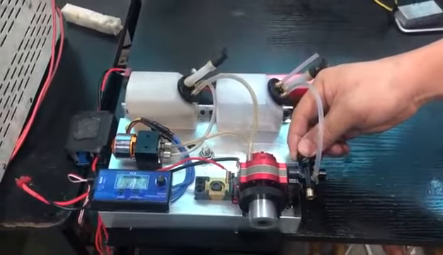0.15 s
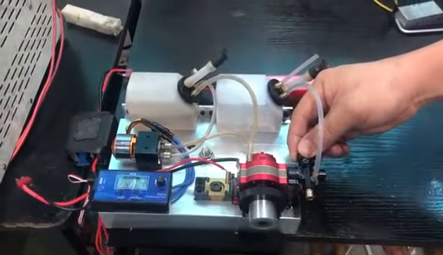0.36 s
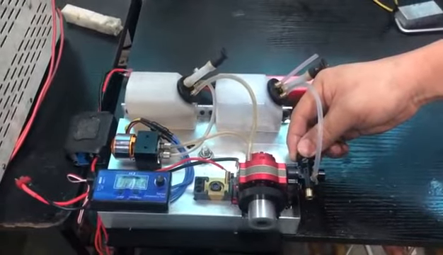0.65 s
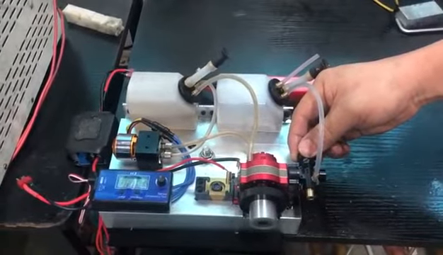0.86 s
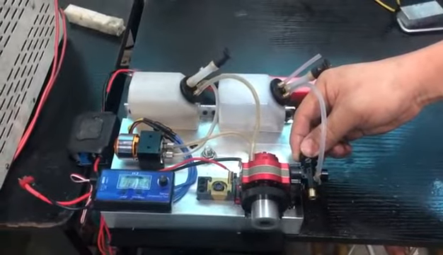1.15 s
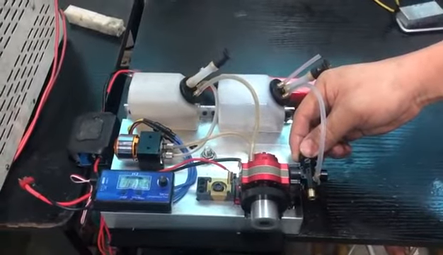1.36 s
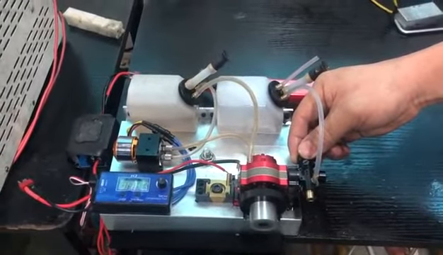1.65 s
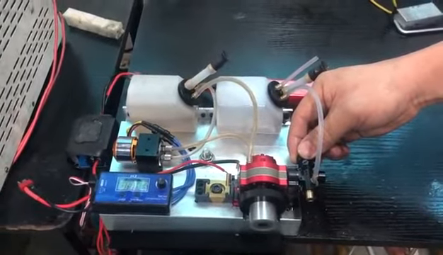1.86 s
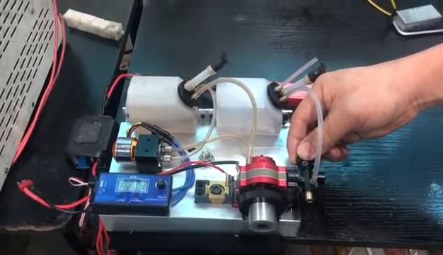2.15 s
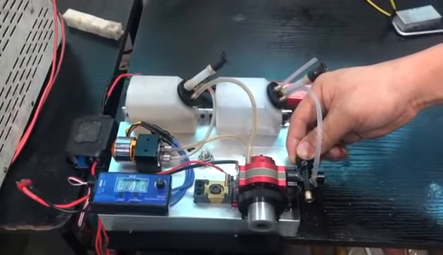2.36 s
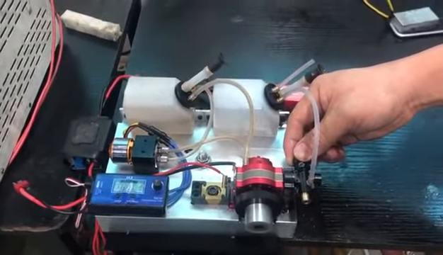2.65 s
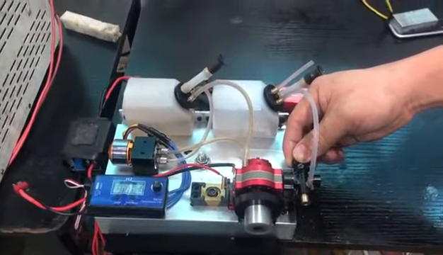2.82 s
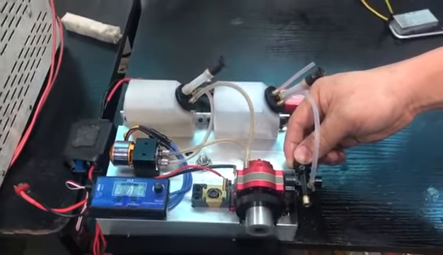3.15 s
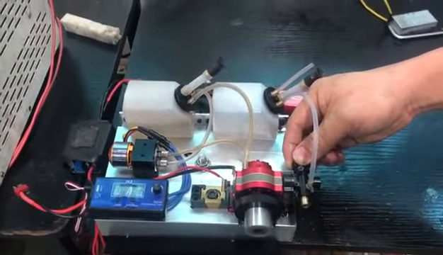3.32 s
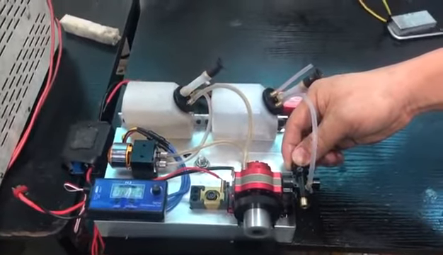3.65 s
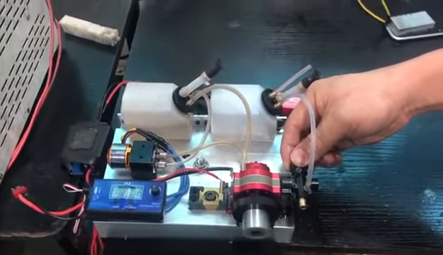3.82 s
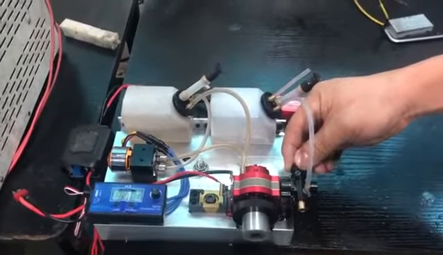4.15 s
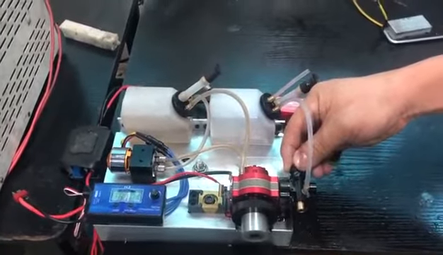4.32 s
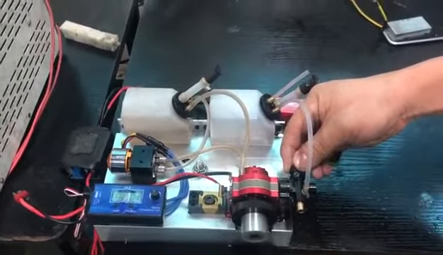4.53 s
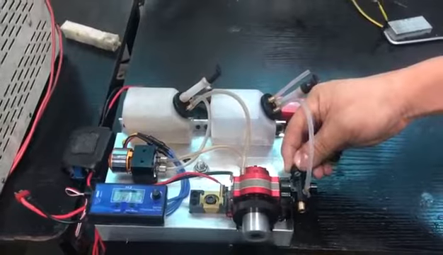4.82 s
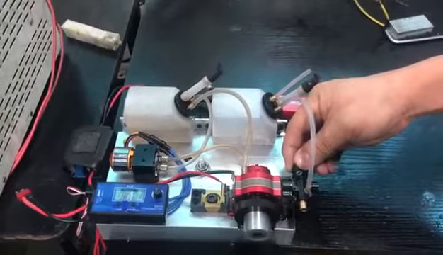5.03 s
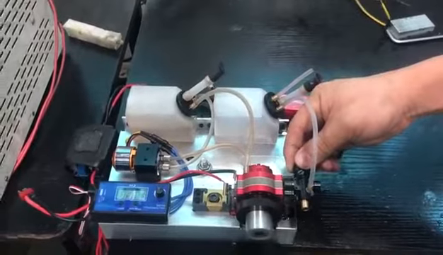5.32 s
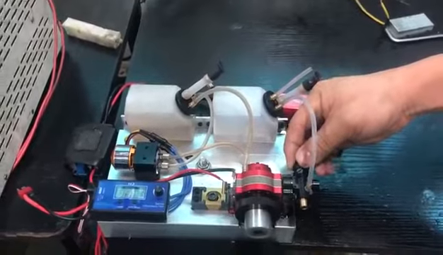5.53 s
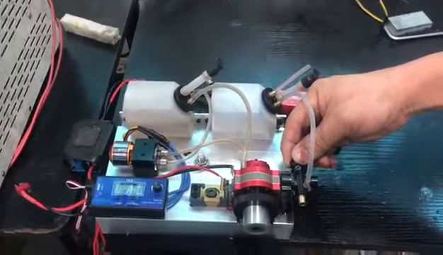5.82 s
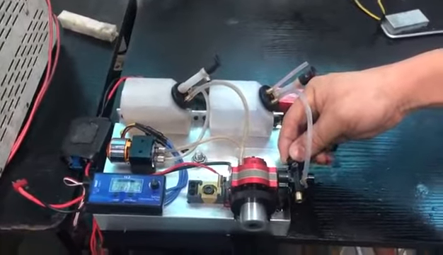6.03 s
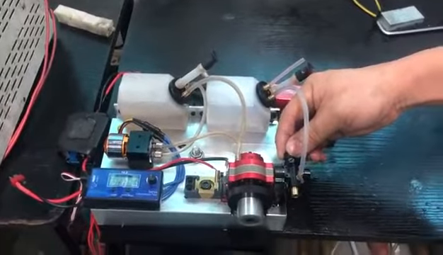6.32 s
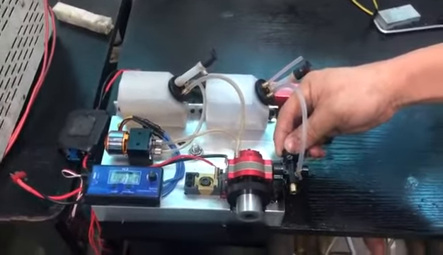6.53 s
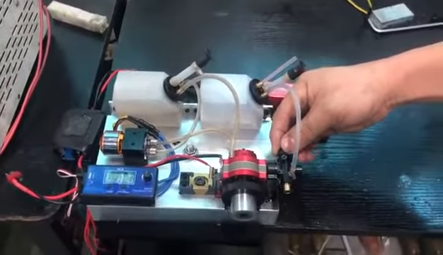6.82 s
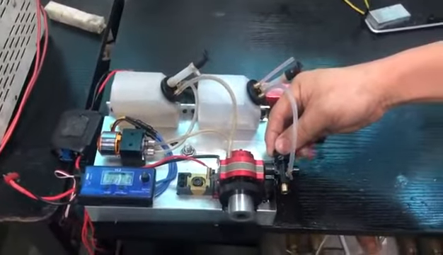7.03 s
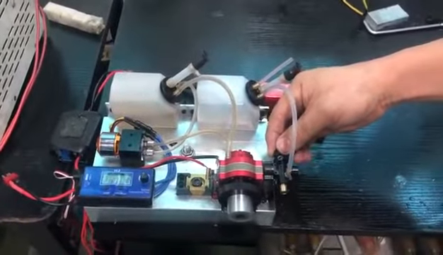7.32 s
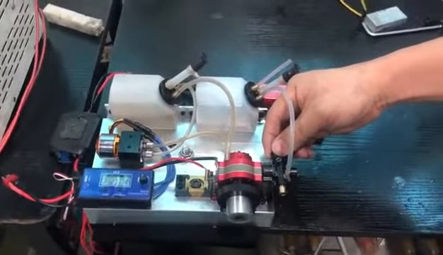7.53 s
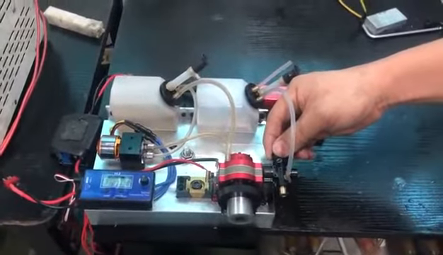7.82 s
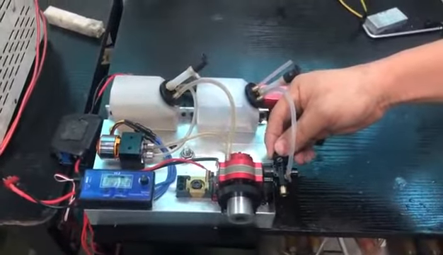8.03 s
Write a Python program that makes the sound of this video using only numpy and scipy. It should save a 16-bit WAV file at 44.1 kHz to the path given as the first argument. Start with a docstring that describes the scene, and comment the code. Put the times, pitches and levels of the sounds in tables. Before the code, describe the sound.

Close by, a small model engine buzzes at full throttle, drops to a rough idle and is blipped again and again.

```python
"""Model rotary engine on a bench

Close by, it runs flat out for four seconds, sputters down, then is blipped seven times.
Each shaft turn opens the exhaust port once: a sharp pop and a spit of gas if the charge burns,
a soft puff if not. The three rotor faces fire slightly unlike, which adds a growl. The eccentric
rotor makes the base hum; off the throttle the engine coasts with a whirr of gears and seals."""
import sys
import numpy as np
from scipy import signal
from scipy.fft import rfft, irfft, next_fast_len
from scipy.io import wavfile
from scipy.ndimage import uniform_filter1d, map_coordinates

SR = 44100
rng = np.random.default_rng(int(sys.argv[2]) if len(sys.argv) > 2 else 0)


def transcribe(u):
    """Save the signal u as a 16-bit wav file named by the first command-line argument.

    u: samples, shape (n,) or (channels, n), limited to [-1, 1]; the rate is SR.
    q: integer samples, one column per channel.
    """
    v = np.clip(np.atleast_2d(u).T, -1, 1)
    q = np.round(v * 32767).astype(np.int16)
    wavfile.write(sys.argv[1], SR, q)


N = 360283
TIME = np.arange(N) / SR
FFT_SIZE = next_fast_len(N + SR, real=True)
HZ = np.fft.rfftfreq(FFT_SIZE, 1 / SR)


def amp(db):
    """Decibels to gain."""
    return 10 ** (np.asarray(db) / 20)


def unit(x):
    """Scale to rms 1."""
    return x / np.sqrt(np.mean(x ** 2) + 1e-20)


def along(points, hz):
    """(freq_hz, value) rows read on a log axis."""
    freqs, values = np.transpose(points)
    return np.interp(np.log(hz + 1), np.log(freqs + 1), values)


def curve(rows):
    """(time_s, value) rows as one value per sample."""
    return np.interp(TIME, *np.transpose(rows))


def wobble(rate_hz):
    """Smooth random curve, rate_hz knots a second."""
    knots = rng.standard_normal(int(N * rate_hz / SR) + 4)
    return map_coordinates(knots, [TIME * rate_hz], mode="nearest")


def filtered(x, gain):
    """Apply a response given on the HZ grid."""
    return irfft(rfft(x, FFT_SIZE) * gain, FFT_SIZE)[:N]


def rolloff(ratio, order):
    """Gain near 1 for ratio < 1, falling as ratio ** -order above."""
    return 1 / np.hypot(1, ratio ** order)


def low_cut(corner_hz, order):
    """High-pass magnitude on the HZ grid."""
    return rolloff(corner_hz / (HZ + 1), order)


def causal(gain):
    """Minimum-phase response of this magnitude: rings only after it is struck."""
    cepstrum = irfft(np.log(np.maximum(gain, 1e-6)), FFT_SIZE)
    cepstrum[1:FFT_SIZE // 2] *= 2
    cepstrum[FFT_SIZE // 2 + 1:] = 0
    return np.exp(rfft(cepstrum))


def resonance(modes):
    """Gain of resonances in small parts, which radiate no bass."""
    power = sum((amp(db) / (1 + 2 * ((HZ - hz) / width_hz) ** 2)) ** 2 for hz, width_hz, db in modes)
    return np.sqrt(power) * low_cut(490, order=10)


def turn_number(turns):
    """Firing index of each sample; steps just before the port opens."""
    return np.floor(turns + .2).astype(int)


def pulses(turns, harmonics=44):
    """One sharp pulse per turn, every harmonic of size 1."""
    offset = turns - np.round(turns)
    return (harmonics + .5) * np.sinc((2 * harmonics + 1) * offset) / np.sinc(offset) - .5


def gusts(turns, decay_turns):
    """Gate of rms 1 that opens once a turn and decays."""
    return unit(np.exp(-(turns % 1) / decay_turns))


# shaft at full throttle: time_s, speed_hz
FULL_SPEED = [(0.03, 379.5), (0.09, 379.8), (0.15, 384.2), (0.32, 382.6), (0.38, 377.3), (0.66, 384.7),
              (0.73, 382.8), (0.89, 387.6), (1.04, 383.4), (1.22, 382.1), (1.28, 389.6), (1.36, 386.3),
              (1.42, 377.3), (1.93, 388.0), (2.3, 389.6), (2.42, 397.4), (2.44, 397.1), (2.47, 380.8),
              (2.51, 379.0), (2.68, 391.7), (2.79, 393.3), (2.87, 383.3), (3.02, 389.9), (3.53, 395.5),
              (3.56, 390.0), (3.59, 395.9), (3.81, 399.7), (3.84, 397.6), (3.93, 399.3), (3.95, 403.7)]
# shaft falling to a rough idle: time_s, speed_hz
RUN_DOWN_SPEED = [(3.99, 397.7), (4.112, 372.4), (4.314, 347.3), (4.324, 334.2), (4.42, 323.5),
                  (4.66, 314.2), (4.686, 302.8), (4.97, 303.2)]
# throttle blips: open_s, peak_s, flame_out_s, start_speed_hz, top_speed_hz, burn_db
THROTTLE_BLIPS = [(5.0, 5.335, 5.388, 306, 387, -12.6), (5.616, 5.99, 6.018, 314, 395.5, -12.3),
                  (6.218, 6.56, 6.622, 320.5, 394, -12.5), (6.892, 7.165, 7.208, 311, 373.5, -13),
                  (7.409, 7.59, 7.611, 319.5, 356, -12.9), (7.722, 7.91, 7.927, 335, 371, -13),
                  (8.03, 8.11, 8.2, 348, 358.5, -14)]


def shaft_speed(inertia_s=.015, sag_hz_per_s=50, coast_s=.2):
    """Turns per second: flat out, run-down, then blips drive the shaft up and friction slows it."""
    first_open_s, _, _, idle_hz, _, _ = THROTTLE_BLIPS[0]
    speed = curve(np.vstack([FULL_SPEED, RUN_DOWN_SPEED, (first_open_s, idle_hz)]))
    for blip, following in zip(THROTTLE_BLIPS, [*THROTTLE_BLIPS[1:], None]):
        open_s, peak_s, out_s, start_hz, top_hz, _ = blip
        climb = np.clip((TIME - open_s) / (peak_s - open_s), 0, 1) ** 1.04
        sag_hz = sag_hz_per_s * np.clip(TIME - peak_s, 0, out_s - peak_s)  # throttle closing
        run_hz = start_hz + (top_hz - start_hz) * climb - sag_hz
        if following is not None:
            next_open_s, _, _, next_hz, _, _ = following
            coasted_s = np.maximum(TIME - out_s, 0)
            slowed = np.expm1(-coasted_s / coast_s) / np.expm1(-(next_open_s - out_s) / coast_s)
            run_hz += (next_hz - run_hz) * slowed
        speed = np.where(TIME >= open_s, run_hz, speed)
    return uniform_filter1d(speed, int(inertia_s * SR) + 1, mode="nearest")


# bursts of firing on a closed throttle: start_s, length_s, burn_db
IDLE_SPUTTERS = [(4.021, .011, -14.3), (4.036, .01, -12.5), (4.052, .017, -13.5), (4.075, .008, -19),
                 (4.089, .012, -16), (4.106, .012, -18), (4.124, .061, -14.8), (4.198, .011, -15.8),
                 (4.23, .01, -17.5), (4.256, .008, -16.5), (4.282, .008, -18.5), (4.327, .008, -13.8),
                 (4.35, .013, -17.8), (4.369, .027, -18.3), (4.427, .03, -20.5), (4.456, .07, -15.3),
                 (4.551, .022, -16.8), (4.597, .008, -18.3), (4.614, .03, -17.8), (4.699, .011, -18.2),
                 (4.718, .059, -16.8), (4.82, .082, -16.6), (4.927, .028, -17.3), (4.957, .045, -16.2),
                 (5.403, .006, -20), (5.421, .004, -15.5), (5.535, .008, -13.3), (5.549, .01, -16.3),
                 (6.041, .006, -20), (6.059, .005, -20.5), (6.133, .022, -19), (6.636, .006, -20.5),
                 (6.668, .005, -22), (6.772, .013, -18), (6.79, .017, -17.7), (6.819, .011, -18.5),
                 (6.835, .007, -16.5), (6.873, .004, -20), (7.281, .014, -13.8), (7.324, .003, -19.5),
                 (7.333, .006, -16.5), (7.374, .02, -13.2), (7.616, .013, -19), (7.653, .009, -16.5),
                 (7.684, .022, -14.5), (7.967, .009, -15.7), (7.991, .013, -15.8), (8.01, .011, -16.5)]


def ignitions(full_until_s=4.003, full_db=-12.5):
    """Stretches in which the charge ignites: start_s, end_s, burn_db."""
    blips = [(open_s, out_s, db) for open_s, _, out_s, _, _, db in THROTTLE_BLIPS]
    sputters = [(start_s, start_s + length_s, db) for start_s, length_s, db in IDLE_SPUTTERS]
    return [(0, full_until_s, full_db)] + blips + sputters


# rotor faces at low speed: strength_db, late_turns
ROTOR_FACES = [(1.3, -.010), (0, .011), (-1.3, 0)]


def rotor_face(speed, turns):
    """Strength and lateness of the face at the port; the faces grow more alike at top speed."""
    mismatch = np.interp(speed, [365, 388], [1, .35])
    return mismatch * np.transpose(ROTOR_FACES)[:, turn_number(turns) % len(ROTOR_FACES)]


# one or two missed firings each: time_s, depth_db
MISFIRES = [(.014, -15), (.126, -9), (.185, -7), (.244, -8), (.275, -7), (.289, -9), (.317, -7),
            (.337, -12), (.351, -13), (.369, -12), (.393, -11), (.406, -7), (.421, -14), (.581, -8),
            (.659, -9), (.675, -11), (.705, -9), (.909, -11), (.926, -10), (.94, -9), (1.151, -16),
            (1.165, -7), (1.181, -11), (1.335, -20), (1.344, -12), (1.362, -10), (1.377, -12), (1.4, -19),
            (1.494, -9), (1.536, -9), (1.559, -11), (1.644, -7), (2.013, -7), (2.19, -11), (2.26, -9),
            (2.438, -14), (2.445, -10), (2.452, -15), (2.459, -5), (2.475, -12), (2.483, -7), (2.51, -11),
            (2.592, -9), (2.808, -8), (2.861, -9), (2.877, -15), (3.01, -11), (3.03, -11), (3.072, -13),
            (3.093, -9), (3.305, -9), (3.31, -10), (3.37, -10), (3.385, -9), (3.785, -9), (3.831, -9),
            (3.848, -11), (3.967, -8), (8.112, -12), (8.128, -10)]


def misfire_db(pop_s, half_width_s=.0027, rebound=.22, rebound_s=.0074):
    """Firings near a misfire weaken; the unburnt fuel makes the next ones harder."""
    def dip(centre_s):
        return np.exp(-((pop_s - centre_s) / half_width_s) ** 2)
    return sum(db * (dip(time_s) - rebound * dip(time_s + rebound_s)) for time_s, db in MISFIRES)


# how well the fuel burns: time_s, gain_db
FUEL_MIXTURE = [(0, 0), (1.8, -0.44), (3.2, -0.04), (3.6, -1.5), (3.9, -0.7), (4.1, -4), (5.1, -1.9),
                (8, -1.67)]


def combustion(speed, turns, db_per_octave=11, closing_db=-5, scatter_db=1.16, smoulder=.3):
    """Burn strength, held for each turn; grows with speed and smoulders on between sputters."""
    turn = turn_number(turns)
    onsets = np.searchsorted(turn, np.arange(turn[-1] + 1))
    pop_s = TIME[onsets] + .0028  # exhaust lag
    strength = np.zeros(len(onsets))
    for start_s, end_s, burn_db in ignitions():
        lit = pop_s > start_s
        now_s = pop_s[lit]
        mean_hz = speed[int(start_s * SR):int(end_s * SR)].mean()
        speed_db = db_per_octave * np.log2(speed[onsets][lit] / mean_hz)
        primed_db = .9 * np.exp(-(now_s - start_s) / .006)  # fuel gathered in the pause
        closing = np.clip((now_s - end_s) / .035 + 1, 0, 1) * (end_s - start_s > .15)  # long runs only
        flame = np.exp(-np.maximum(now_s - end_s, 0) / .0015)
        level_db = burn_db + speed_db + primed_db + closing_db * closing
        strength[lit] = np.maximum(strength[lit], amp(level_db) * flame)
    recent_burn = signal.lfilter([.25], [1, -.75], strength)
    strength = np.maximum(strength, smoulder * recent_burn)
    face_db, _ = rotor_face(speed, turns)
    charge_db = (curve(FUEL_MIXTURE) + face_db)[onsets] + misfire_db(pop_s)
    random_db = scatter_db * rng.standard_normal(N)[onsets] + wobble(70)[onsets]
    return (strength * amp(charge_db + random_db))[turn]


def bright_burn(burn, knee_db=-13):
    """Drive of the bright parts of a pop: weak burns are duller."""
    return burn * np.minimum(burn / amp(knee_db), 1) ** .15


# gas jet spectrum: freq_hz, relative_db
JET_SPECTRUM = [(220, -40), (500, 12), (2100, 12), (2950, 2), (3500, 2), (4150, -13), (6000, -11.5),
                (9000, -17.5), (12000, -10.5), (14000, -16)]
# fine comb of thin peaks over the treble: freq_hz, width_hz, relative_db
PORT_MODES = [(4330, 36, -1.5), (4600, 87, -1.5), (4880, 33, -0.5), (5150, 49, -1.5), (5440, 57, 1),
              (5960, 130, 4), (6470, 82, -5), (6820, 83, 1.5), (7030, 90, 3.5), (7620, 44, -2),
              (7710, 51, 2.5), (8330, 120, 0.5), (8780, 77, -0.5), (9450, 55, 3.5), (9700, 56, 1),
              (10550, 53, 5.5), (10660, 69, -0.5), (10980, 120, 4), (11410, 150, 5.5), (12280, 170, 4),
              (12840, 320, -5), (14100, 130, -6)]
TOP_HZ = 14250


def port_colour(ring_db=-2.5):
    """Bright response of the port: broad gas jet with a fine comb of thin peaks on top."""
    rings = resonance(PORT_MODES)
    broad = amp(along(JET_SPECTRUM, HZ)) * low_cut(3300, order=6)
    return unit(np.hypot(broad, amp(ring_db) * rings / rings.max()) * (HZ < TOP_HZ))


# resonances of exhaust, base plate and bench: freq_hz, width_hz, gain_db
BODY_MODES = [(585, 160, -8), (720.4, 56, -5.5), (813.4, 67, -4), (924, 34, -3.5), (1001, 16, -4.5),
              (1153, 130, -3), (1320, 95, -3), (1380, 49, -2.5), (1467, 11, -1), (1600.4, 52, -1),
              (1681, 71, -0.5), (1850, 66, -2.5), (1939, 45, -7.5), (2185, 69, -11.5), (2300, 27, -11),
              (2400, 32, -14.5), (2524, 72, -6), (2653, 45, -9.5), (2763, 53, -8.5), (3071, 59, -16.5),
              (3260, 67, -5), (3519, 63, -13), (3791, 44, -10.5), (3980, 48, -21), (4343, 50, -23.5),
              (4520, 48, -27)]


def body_colour():
    """Midrange response of the parts that the engine sets ringing."""
    return resonance(BODY_MODES)


def bounce(delay_s, share):
    """All-pass: close reflections spread a pulse in time and keep its colour."""
    lag = np.exp(-2j * np.pi * HZ * delay_s)
    return (lag + share) / (1 + share * lag)


def dispersion(lag_s=.000963, corner_hz=2180):
    """All-pass: the low part of a pop builds up after its crack."""
    return np.exp(-2j * np.pi * lag_s * corner_hz * np.arctan(HZ / corner_hz))


def exhaust(speed, turns, burn, body, port, pop_db=-1.5, crack_db=-25, puff_db=-32, swirl_db=-24):
    """Pops, unburnt puffs and swirling gas ring the exhaust; each pop's steep front cracks."""
    jitter_turns = .002 * rng.standard_normal(N)[turn_number(turns)]
    _, late_turns = rotor_face(speed, turns)
    train = pulses(turns - late_turns - jitter_turns)
    pops = -amp(pop_db) * filtered(burn * train, causal(body))
    front = causal(port * low_cut(4300, order=8))
    glances = bounce(delay_s=.00021, share=.55) * bounce(delay_s=.00093, share=.8)
    cracks = -amp(crack_db) * filtered(bright_burn(burn) * train, front * glances)
    leak = amp(2 * wobble(120))
    puffs = -amp(puff_db) * filtered(train * leak, causal(body * rolloff(HZ / 2600, order=2)))
    gas = burn * gusts(turns, decay_turns=.5) * rng.standard_normal(N)
    swirl = amp(swirl_db) * filtered(gas, causal(unit(body)))
    return cracks + filtered(pops + puffs + swirl, dispersion())


def gas_jet(turns, burn, port, gain_db=-16, scatter_db=1):
    """Hot gas spits from the port at each burn; a hiss flows on between the spits."""
    scatter = amp(scatter_db * rng.standard_normal(N))[turn_number(turns)]
    spits = scatter * burn * gusts(turns, decay_turns=.22)
    hiss = np.hypot(.85 * burn, .5 * uniform_filter1d(burn, SR // 50))
    envelope = np.hypot(.48 * spits, .88 * hiss)
    return amp(gain_db) * filtered(envelope * rng.standard_normal(N), causal(port))


# rotor, gears and seals: freq_hz, relative_db
WHIRR_SPECTRUM = [(120, 14.5), (200, -1.5), (450, -2.5), (900, 1.5), (1700, -25), (2100, -6), (2650, 3),
                  (3100, -2.5), (4100, 0.5), (4700, -7), (6500, -4.5), (9000, -16), (12300, -8),
                  (14000, -48)]


def gear_whirr(speed, turns, burn, body, loaded_db=-28, coasting_db=-31, rattle_db=-33, db_per_octave=6):
    """Gears and seals rub, louder with speed; unloaded, they rattle the base once a turn."""
    def rub(low_hz):
        colour = amp(along(WHIRR_SPECTRUM, HZ)) * low_cut(low_hz, order=7)
        return unit(filtered(rng.standard_normal(N), colour))
    drive = uniform_filter1d(burn, SR // 30)
    slack = rolloff(drive / amp(-16), order=4)
    coasting = amp(coasting_db) * slack * rub(low_hz=200)
    loaded = amp(loaded_db) * np.sqrt(1 - slack ** 2) * rub(low_hz=320)
    chatter = gusts(turns, decay_turns=.98) * rng.standard_normal(N)
    rattle = amp(rattle_db) * slack * filtered(chatter, causal(unit(body)))
    level_db = db_per_octave * np.log2(speed / speed.mean()) + .9 * wobble(110)
    return amp(level_db) * (coasting + loaded + rattle)


# response of the base to the rotor: speed_hz, level_db
BASE_RESPONSE = [(300, -42), (310, -31.5), (323, -29), (338, -33), (352, -29.5), (365, -24.5), (380, -32.5),
                 (404, -42)]


def rotor_hum(speed, turns, burn, loaded_db=-13.5, coasting_db=-3.5, waver_db=2.5):
    """The eccentric rotor shakes the base once a turn; under load the hum is weaker and wavers more."""
    drive = uniform_filter1d(burn, SR // 30)
    load = 1 - rolloff(drive / amp(-13.5), order=6)
    slack = rolloff(drive / amp(-15), order=6)
    level_db = along(BASE_RESPONSE, speed) + loaded_db * load + coasting_db * slack
    flutter_db = wobble(90) + waver_db * (1 + load) * wobble(17)
    return amp(level_db + flutter_db) * unit(np.sin(2 * np.pi * turns))


# workshop reverberation: freq_hz, t60_s
ROOM_DECAY = [(200, 0.055), (2000, 1), (12000, 0.006)]


def room(x):
    """Diffuse workshop tail, 5 ms late; the midrange rings longest."""
    hz, time_s, spectra = signal.stft(rng.standard_normal(SR // 2), SR, nperseg=256)
    decay = amp(-60 * time_s / along(ROOM_DECAY, hz)[:, None])
    _, tail = signal.istft(spectra * decay, SR, nperseg=256)
    return signal.fftconvolve(np.pad(x, (SR // 200, 0)), tail / np.linalg.norm(tail))[:N]


def scene(room_db=-20):
    """One shaft drives every part of the sound."""
    speed = shaft_speed() * (1 + .0016 * wobble(28))
    turns = np.cumsum(speed) / SR
    burn = combustion(speed, turns)
    body, port = body_colour(), port_colour()
    engine = exhaust(speed, turns, burn, body, port)
    engine += gas_jet(turns, bright_burn(burn), port)
    engine += gear_whirr(speed, turns, burn, body)
    return (engine + rotor_hum(speed, turns, burn) + amp(room_db) * room(engine))[None]


def record(dry):
    """Close microphone: rounds the highest peaks, cuts deep bass and everything above TOP_HZ."""
    rounded = dry[0] / (1 + dry[0] ** 6) ** (1 / 6)
    return filtered(rounded, (HZ < TOP_HZ) * low_cut(100, order=4))[None]


dry = scene()
out = record(dry)
transcribe(out)
```